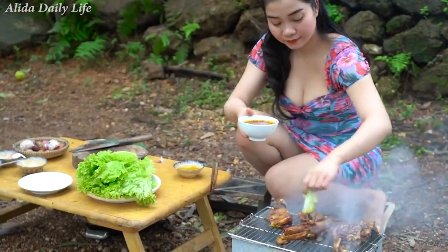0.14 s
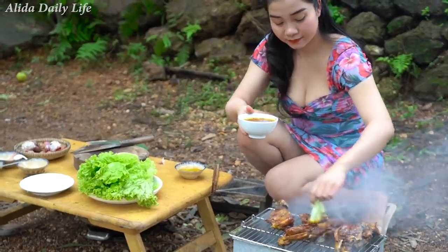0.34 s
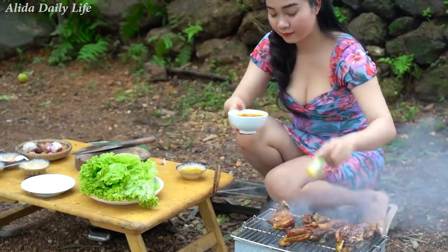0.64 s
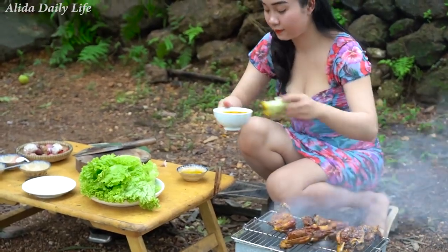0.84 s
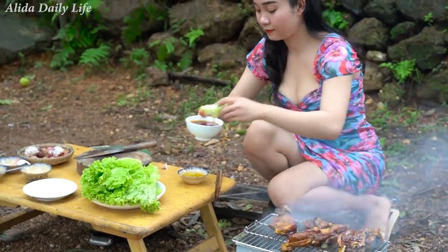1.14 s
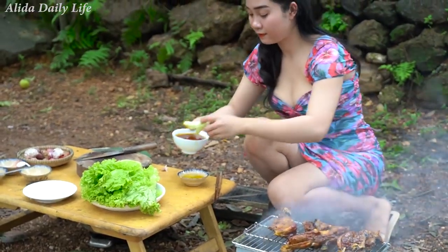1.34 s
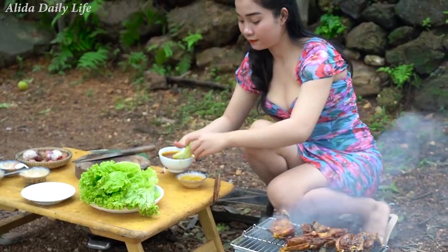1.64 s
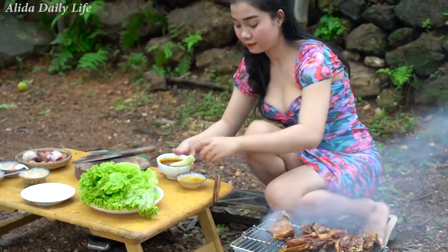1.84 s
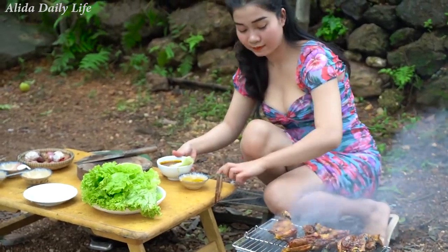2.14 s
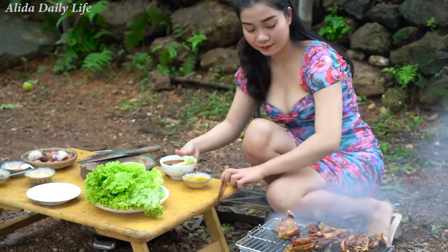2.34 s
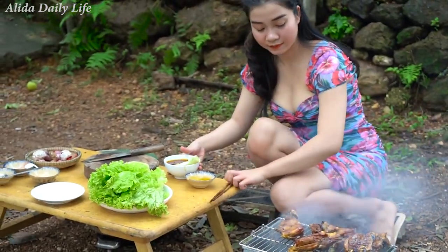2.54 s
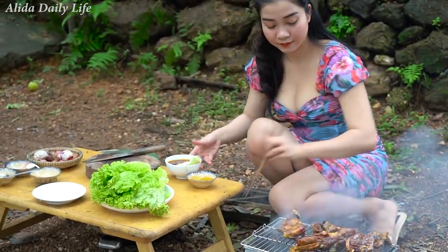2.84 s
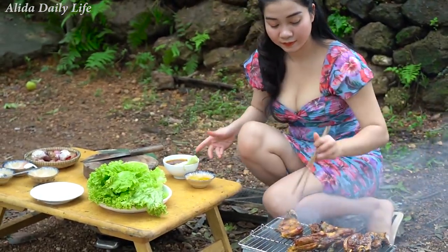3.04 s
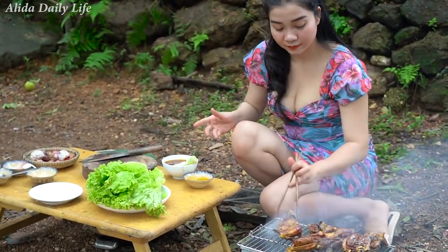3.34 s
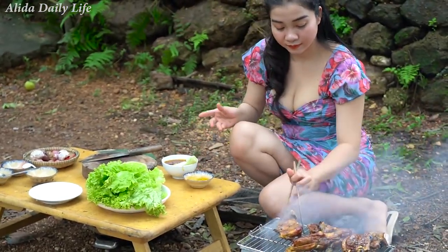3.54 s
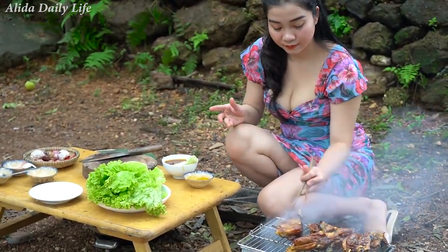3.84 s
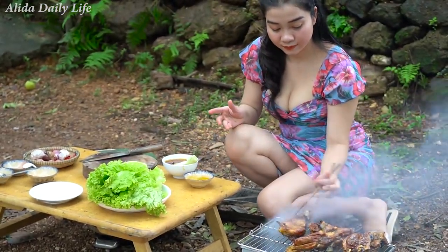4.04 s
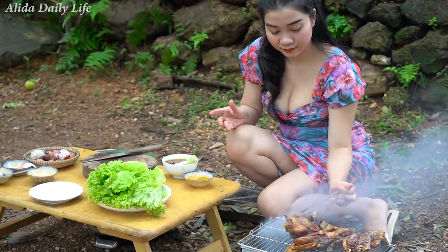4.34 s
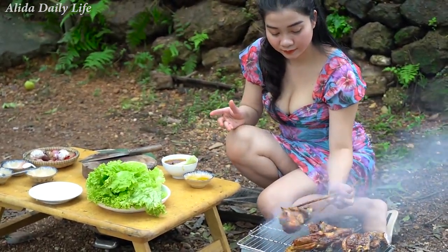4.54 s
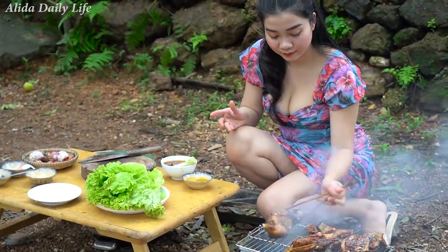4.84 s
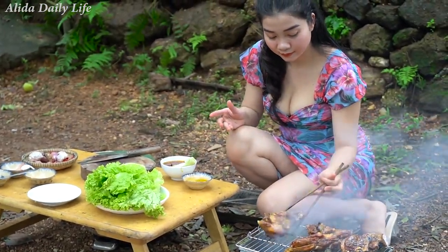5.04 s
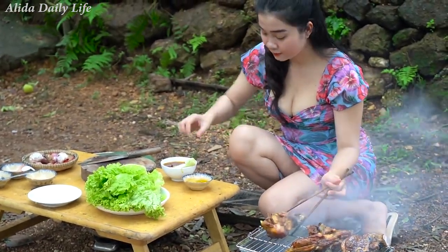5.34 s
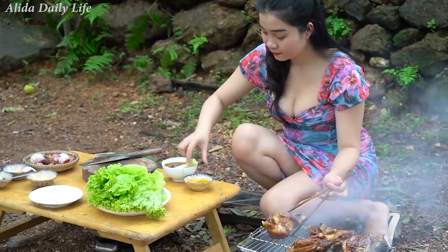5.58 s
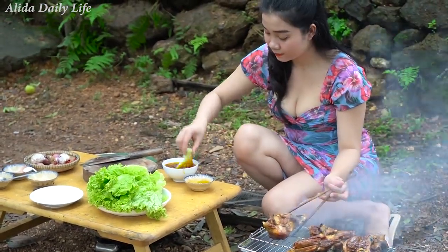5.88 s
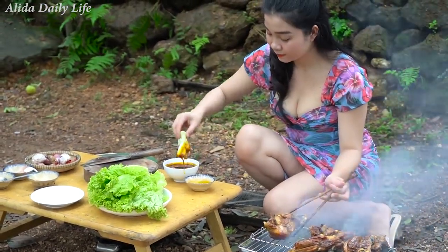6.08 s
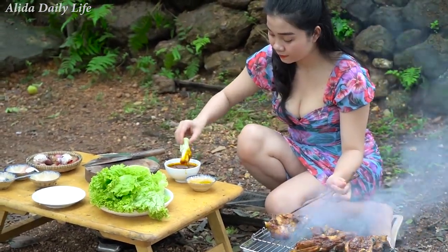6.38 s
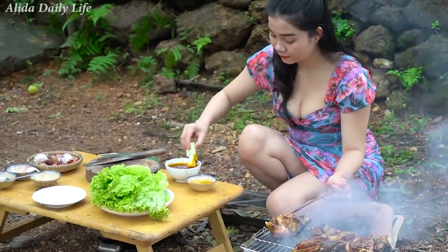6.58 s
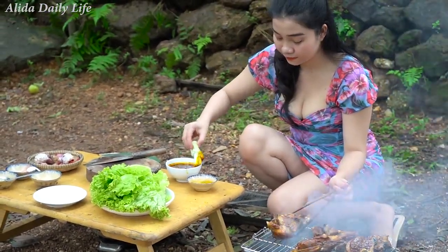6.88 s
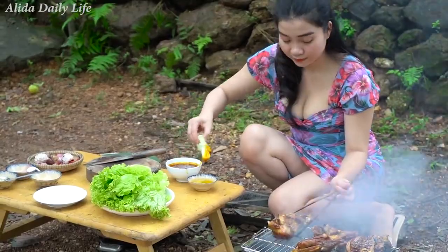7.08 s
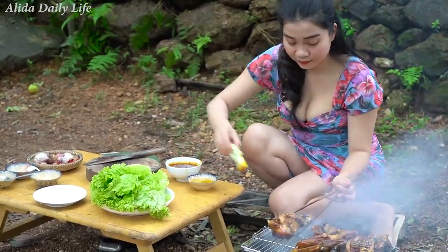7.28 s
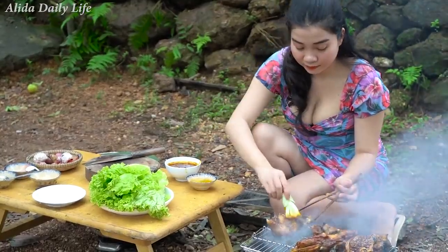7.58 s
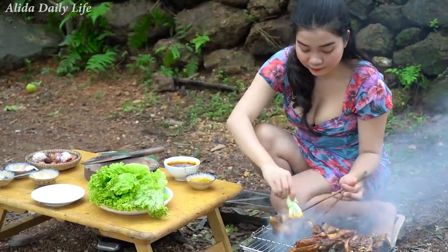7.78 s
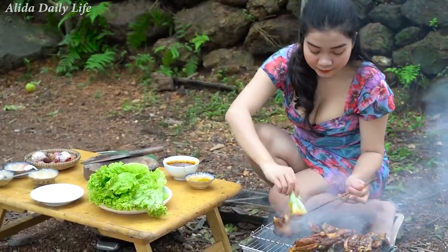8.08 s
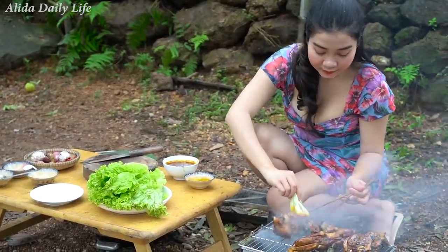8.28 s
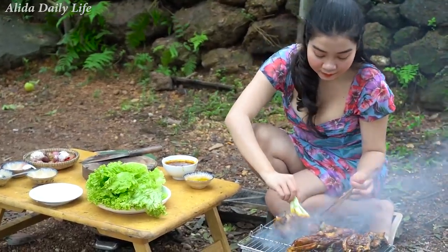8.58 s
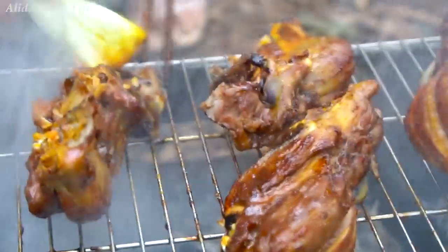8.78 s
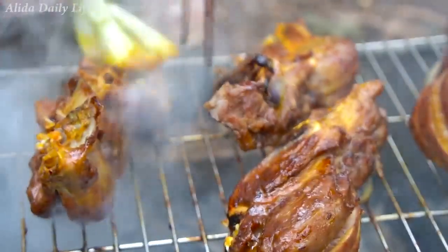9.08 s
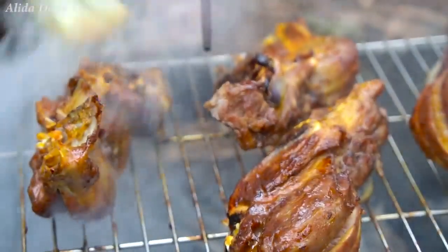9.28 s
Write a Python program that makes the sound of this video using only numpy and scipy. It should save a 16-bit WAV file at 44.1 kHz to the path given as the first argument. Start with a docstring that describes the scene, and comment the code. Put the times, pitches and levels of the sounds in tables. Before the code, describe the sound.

Meat sizzles softly over charcoal in a yard with a bowl knock, chopstick clacks and faint birds, then suddenly fries loud and close.

```python
"""Meat sizzles on a wire rack over charcoal in a yard: a hiss with many tiny bubble bursts in it.
It flares up as it is turned and basted; sauce bubbles, steam hisses, fat spits, an ember cracks.
A china bowl is set on a low wooden table and chopsticks clack: struck modes that ring and die.
A small bird pipes (gliding sines) and a far dog barks (two rough sinking tones) over a soft rush.
For the last moments the sizzle is also heard from right above the rack."""
import sys
import numpy as np
from scipy import signal
from scipy.fft import rfft, irfft, next_fast_len
from scipy.io import wavfile
from scipy.ndimage import uniform_filter1d, map_coordinates

SR = 44100
rng = np.random.default_rng(int(sys.argv[2]) if len(sys.argv) > 2 else 0)


def pcm_store(signal):
    """Save signal as 16-bit PCM."""
    levels = np.round(np.clip(np.atleast_2d(signal), -1, 1) * 32767)
    wavfile.write(sys.argv[1], SR, levels.astype(np.int16).T)


N = 415422

CLOSE_S = 8.786  # from here on the rack is also heard close up
TOP_HZ = 16050  # nothing is kept above this pitch
# colour of the frying heard close up: (frequency [Hz], level [dB])
FRYING_CLOSE = [(40, -52), (130, -38), (280, -30.5), (420, -20), (650, -8), (800, -10.5), (1000, -7.5),
                (1200, -18), (1600, -19), (2150, -4), (3000, -6), (4600, -5.5), (6200, -2), (7600, -2.5),
                (10000, 1), (12800, -0.5), (15500, -4)]


def amp(db):
    """Turn decibels into a gain."""
    return 10 ** (np.asarray(db) / 20)


def unit(x):
    """Scale to an average strength (rms) of 1."""
    return x / np.sqrt(np.mean(x ** 2) + 1e-20)


def along(points, hz):
    """Read a curve of (frequency, value) points, joined on a log frequency axis."""
    f, v = np.transpose(points)
    return np.interp(np.log(hz + 1), np.log(f + 1), v)


def curves(rows):
    """Give one value per sample for each column after the time."""
    s, *cols = np.transpose(rows)
    return [np.interp(np.arange(N) / SR, s, c) for c in cols]


def wobble(rate):
    """A smooth random curve that passes rate random points a second."""
    points = rng.standard_normal(int(N * rate / SR) + 4)
    return map_coordinates(points, [np.arange(N) * rate / SR])


def filtered(x, response):
    """Filter x by a response given as a function of frequency."""
    n = x.shape[-1]
    m = next_fast_len(n + 8192)
    return irfft(rfft(x, m) * response(np.fft.rfftfreq(m, 1 / SR)), m)[..., :n]


def resonance(f, hz, width):
    """Response of one resonance, which only rings after it is hit."""
    return 1j * f * width / (hz * hz - f * f + 1j * f * width)


def coloured(x, spectrum, size=2048):
    """Give x a colour with a filter that only looks back, so that ticks keep their sharp front."""
    cepstrum = irfft(np.log(amp(along(spectrum, np.fft.rfftfreq(size, 1 / SR)))))
    kernel = irfft(np.exp(rfft(2 * cepstrum[:size // 2], size) - cepstrum[0]))
    return signal.fftconvolve(x, kernel[None], axes=1)[:, :N]


def add(track, s, sound):
    """Mix a sound into the track at s seconds."""
    part = track[..., round(s * SR):][..., :sound.shape[-1]]
    part += sound[..., :part.shape[-1]]


def hiss(side_db):
    """Stereo white noise of rms 1; side_db sets how wide it is."""
    mid, side = rng.standard_normal((2, N))
    return unit(np.array([mid + amp(side_db) * side, mid - amp(side_db) * side]))


def in_yard(x, near_db, far_db, near_t60=0.11):
    """A first scatter, quick or lingering as near_t60 sets, and a far echo off the stone wall and trees."""
    # how long the far echo lasts: (frequency [Hz], time to fall 60 dB [s])
    yard = [(200, 0.18), (1500, 0.4), (5000, 0.41), (15000, 0.063)]
    t = np.arange(SR // 2) / SR  # every echo ends after half a second
    near = rng.standard_normal((2, len(t))) * amp(-60 * t / near_t60) * (t > .001)
    hz, frames, z = signal.stft(rng.standard_normal((2, len(t))), SR, nperseg=256)
    fading = z * amp(-60 * frames / along(yard, hz)[:, None])
    far = signal.istft(fading, SR, nperseg=256)[1][:, :len(t)]
    echo = amp(near_db) * near / np.linalg.norm(near[0])
    echo = echo + amp(far_db) * far / np.linalg.norm(far[0])
    echo = echo + 0.27 * echo[::-1]  # the two microphones share part of each echo
    return x + signal.fftconvolve(np.atleast_2d(x), echo, axes=1)[:, :x.shape[-1]]


def heat():
    """Drive levels of frying and fine spray: flares and jets add their power to the resting sizzle."""
    # juice runs onto the coals and flares up:
    # (time [s], hold [s], frying level [dB], fine spray over frying [dB])
    flares = [(-0.1, 0.087, -55, -1.5), (0.305, 0.22, -61.5, -0.5), (0.647, 0.09, -62, 4),
              (1.23, 0.11, -62, 1.5), (2.713, 0.31, -54, 2.5), (3.24, 0.033, -57.5, 0),
              (3.667, 0.05, -62, -1), (3.967, 0.22, -71, 5.5), (4.798, 0.28, -58, 6.5),
              (5.13, 0.41, -58, 2.5), (5.495, 0.38, -61, -1.5), (5.94, 0.046, -66.5, 6),
              (6.22, 0.68, -64.5, 4), (6.97, 0.66, -66.5, 5), (7.9, 0.8, -76, 10.5), (8.59, 0.13, -61, 3)]
    # steam jets out of blisters in the fat, bright and short-lived:
    # (time [s], length [s], spray level [dB])
    jets = [(6.392, 0.42, -57.5), (6.58, 0.039, -52), (7.002, 0.22, -56), (7.321, 0.15, -51.5),
            (7.72, 0.74, -55.5), (7.907, 0.12, -51.5), (8.102, 0.089, -54.5), (8.555, 0.044, -59)]
    flare_rise_s, flare_fade_s = 0.024, 0.25
    fade_power = 1.38  # a flare dies quickly at first, then lingers
    jet_rise_s, jet_fade_s = 0.0085, 0.023
    jet_frying_db = -13  # frying relative to the spray of a jet
    t = np.arange(N) / SR
    frying, spray = amp(-69) ** 2, amp(-68.5) ** 2  # power at rest
    for s, hold, db, bright_db in flares:
        age = np.maximum(t - s, 0)
        rise = 1 - np.exp(-age / flare_rise_s)
        flare = amp(db) * rise / (1 + np.maximum(age - hold, 0) / flare_fade_s) ** fade_power
        frying = frying + flare ** 2
        spray = spray + (amp(bright_db) * flare) ** 2
    for s, length, db in jets:
        age = np.maximum(t - s, 0)
        rise = 1 - np.exp(-age / jet_rise_s)
        jet = amp(db) * rise * np.exp(-np.maximum(age - length, 0) / jet_fade_s)
        frying = frying + (amp(jet_frying_db) * jet) ** 2
        spray = spray + jet ** 2
    return 10 * np.log10(frying), 10 * np.log10(spray)


def bursts(rate, spread_db, width_db, largest):
    """Tiny bubbles bursting all over the rack: most are weak, a few are strong."""
    chance, size = rng.random(N), rng.exponential(size=N)
    place, sign = rng.standard_normal(N), rng.choice([-1, 1], N)
    ticks = (chance < rate / SR) * sign * amp(spread_db * np.minimum(size, largest))
    sides = amp(np.array([place, -place]) * width_db / 2)
    return unit(ticks * sides / np.linalg.norm(sides, axis=0))


def patchy(x, depth_db=1.5):
    """Single spots of fat flare and die, so the colour of the sizzle keeps shifting."""
    z = signal.stft(x, nperseg=512)[2]
    field = uniform_filter1d(rng.standard_normal(z.shape[1:]), size=7, axis=0)  # across frequency
    field = uniform_filter1d(field, size=14, axis=1)  # across time
    return unit(signal.istft(z * amp(depth_db * unit(field)), nperseg=512)[1][:, :N])


def sizzle(frying_db, spray_db, count=3):
    """From a distance the bursts blur into a hiss; fresh juice on the coals adds a fine bright spray."""
    # colour of the frying heard from a distance: (frequency [Hz], level [dB])
    frying_colour = [(100, -52.5), (250, -23), (500, -11.5), (900, -7), (1150, -10), (1500, -5),
                     (2000, -1.5), (2500, -0.5), (3300, -3), (4500, -3.5), (5900, -1.5), (7500, -4.5),
                     (9700, -5), (15500, -9)]
    # each piece of meat has its own bursts, and most of their sound bounces around in the firebox first
    pieces = [bursts(rate=230, spread_db=3.5, width_db=-2, largest=3.2) for _ in range(count)]
    crackle = sum(in_yard(ticks, near_db=10.0, far_db=7.5, near_t60=0.031) for ticks in pieces)
    fry = patchy(coloured(hiss(side_db=-2.0) + amp(3.0) * unit(crackle), frying_colour))
    spray = filtered(fry, lambda f: 1 - 1 / (1 + (f / 7000) ** 4))  # the treble part
    flutter_db = .8 * unit(wobble(45) + wobble(13))
    low_part = amp(frying_db + 5.0) * (fry - spray)
    bright_part = amp(spray_db + 7.0) * spray * amp([[.3], [-.3]])  # slightly to the left
    return amp(flutter_db) * (low_part + bright_part)


def close_level(s):
    """Level in dB of the close sizzle: fresh sauce fries louder at first, then it slowly sags."""
    sag_db_per_s, sauce_db, sauce_fade_s = 2, 2.5, 0.083
    age = np.maximum(s - CLOSE_S, 0)
    return -34.5 - sag_db_per_s * age + sauce_db * np.exp(-(age / sauce_fade_s) ** 2)


def sizzle_close(drops, count=3):
    """Above the rack single bursts stand out, in clumps, mostly from the basted piece on the left."""
    t = np.arange(N) / SR
    spots = [bursts(rate=1800, spread_db=4.1, width_db=5, largest=4.0) for _ in range(count)]
    crackle = sum(in_yard(ticks, near_db=-4.0, far_db=-17, near_t60=0.026) for ticks in spots)
    fry = patchy(coloured(amp(-8.5) * hiss(side_db=-2) + unit(crackle), FRYING_CLOSE))
    left_db = [(1800, -1.0), (7000, 3.5), (14000, 4.5)]  # left over right: (frequency [Hz], level [dB])
    fry = filtered(fry, lambda f: amp(np.array([[.5], [-.5]]) * along(left_db, f)))
    fat = spits(drops, breadth=2, near_db=-6, far_db=-14, low_hz=700, splash=.2, life=.005)
    level_db = close_level(t) + 0.75 * wobble(70)  # boils off in small surges
    fade_in = np.clip((t - CLOSE_S) / .002, 0, 1)
    rack = (amp(level_db) * fry + fat) * fade_in
    lead_s = 9e-6  # the sound reaches the left microphone first
    return filtered(rack, lambda f: np.exp(1j * np.pi * f * lead_s * np.array([[1], [-1]])))


def bubbles(rate, hz, scatter, cycles, spread_db, size=1024):
    """Stereo patter of small sauce bubbles; each rings for some cycles, rising in pitch."""
    count = round(rate * N / SR)
    start, strength, place = rng.random((count, 3)).T
    pitch = hz * np.exp(scatter * np.clip(rng.standard_normal((count, 1)), -2, 2))
    age = pitch * np.arange(size) / SR / cycles
    rings = np.exp(-2 * age) * np.sin(2 * np.pi * cycles * age * (1 + 0.024 * age))
    rings = rings * amp(-spread_db * np.log(strength + 0.017))[:, None]  # few are strong
    index = ((start * N).astype(int)[:, None] + np.arange(size)).ravel()

    def channel(side):
        return np.bincount(index, (rings * np.sqrt(side)[:, None]).ravel(), N + size)[:N]

    return unit(np.array([channel(place), channel(1 - place)]))


def simmer(frying_db):
    """The marinade boils on the meat, wetter and lower than the frying fat."""
    # wet bubbling near the microphone: (time [s], level [dB])
    simmer_close = [(8.8, -59), (9.0, -63), (9.17, -52), (9.27, -59), (9.33, -47), (9.42, -49)]
    close_db, = curves(simmer_close)
    far = bubbles(rate=260, hz=2200, scatter=.22, cycles=16, spread_db=3.2)
    near = bubbles(rate=900, hz=2300, scatter=.3, cycles=11, spread_db=3.5)
    boil = amp(frying_db - 6.5) * unit(in_yard(far, near_db=1.0, far_db=-9.0))
    boil = boil + amp(close_db) * near * (np.arange(N) > CLOSE_S * SR)
    return filtered(boil, lambda f: (1j * f / (600 + 1j * f)) ** 2)  # tiny bubbles radiate no bass


def spitting(spray_db):
    """List all spits: the loud ones, and small ones at random whose size follows the sizzle."""
    # the loudest fat spits:
    # (time [s], peak level before echoes [dB], pitch [Hz], left over right [dB])
    loud_spits = [(2.2553, -47, 7430, 0.5), (4.1774, -46, 6350, 0.5), (4.8228, -35.5, 5700, -2),
                  (4.8785, -21, 8200, 1.5), (4.882, -27, 7000, 1), (5.84, -40, 3000, 0),
                  (6.755, -37, 4500, 0), (7.0998, -29.5, 9150, 0), (7.765, -33, 8000, 0),
                  (7.847, -36, 9500, 0), (8.004, -35, 10000, 0), (8.061, -35, 9000, 0),
                  (8.125, -32.5, 8000, 0), (8.257, -30, 8050, -1.5), (8.2815, -27, 7800, -2),
                  (8.3358, -25, 7860, 0.5), (8.362, -34, 8500, 0), (8.5505, -29.5, 7400, 0.5),
                  (8.5786, -32.5, 10000, 1), (8.667, -32, 9500, 0), (8.8118, -15.5, 3500, 2),
                  (8.8297, -11.5, 12000, 4), (8.837, -16, 9300, 3), (8.8806, -19, 9000, 3),
                  (8.928, -20, 5000, 3), (8.9445, -15.5, 10000, 3), (8.956, -17.5, 13000, 3),
                  (8.9765, -19, 10000, 3), (8.9895, -11.5, 9000, 3), (9.008, -15.5, 10000, 3.5),
                  (9.0255, -15.5, 9000, 3.5), (9.043, -20, 9000, 3), (9.072, -18, 10000, 3),
                  (9.0785, -17, 12000, 3), (9.095, -21, 7000, 3), (9.1515, -15.5, 9000, 2.5),
                  (9.1535, -19.5, 4500, 2), (9.1695, -11, 6000, 1.5), (9.1708, -21, 3000, 1.5),
                  (9.173, -18, 10000, 2), (9.2285, -19, 10000, 3), (9.239, -19.5, 10000, 3),
                  (9.285, -18.5, 8000, 3), (9.2985, -19, 4000, 2.5), (9.303, -19, 8000, 2.5),
                  (9.3592, -12, 6500, 2), (9.3602, -19, 9000, 3), (9.4145, -22, 2500, 2)]
    count = round(16 * N / SR)  # 16 small spits a second
    s = (np.arange(count) + rng.random(count)) / count * N / SR
    size, pitch, place = rng.standard_normal((count, 3)).T
    level_db = spray_db[(s * SR).astype(int)] + 13 + 2.5 * np.minimum(size, 1)
    small = np.transpose([s, level_db, 8500 * np.exp(.2 * pitch), place])
    return np.vstack([loud_spits, small])


def spits(rows, breadth, near_db, far_db, low_hz, splash, life, size=256):
    """Each drop of fat bursts with one broad snap and a brief splash that dies within life seconds."""
    out, t = np.zeros((2, N + size)), np.arange(SR // 4) / SR

    def tone(f, hz):
        return resonance(f, hz, breadth * hz) * (1j * f / (low_hz + 1j * f)) ** 2 * (f < TOP_HZ)

    for s, db, hz, pan_db in rows:
        splatter = splash * rng.standard_normal(len(t)) * amp(-60 * t / life)
        burst = np.pad(signal.unit_impulse(len(t)) + splatter, (size, 0))
        snap = filtered(burst, lambda f: tone(f, hz))
        heard = in_yard(snap / np.abs(snap).max(), near_db, far_db, near_t60=0.06)
        add(out, s, amp(db) * amp([[pan_db / 2], [-pan_db / 2]]) * heard)
    return out[:, size:]  # take off the padding again


def steam():
    """Steam squeezes out in narrow hisses that fade; a burst blister wheezes in several resonances."""
    # splits in the skin:
    # (time [s], fade [s], centre [Hz], width [Hz], level of the shared middle [dB])
    vents = [(0, 0.26, 8900, 2200, -59.5), (0, 0.25, 8250, 300, -65), (0, 0.2, 10200, 400, -66),
             (0, 0.3, 3850, 550, -66.5), (4.88, 0.9, 5650, 1200, -62), (4.88, 0.2, 8500, 900, -59),
             (4.95, 0.5, 2300, 450, -67)]
    # resonances of the blister near the microphone: (frequency [Hz], width [Hz], relative level [dB])
    wheeze_bands = [(1830, 150, 0), (3250, 150, 0), (5800, 90, 1), (6760, 90, -2), (8030, 200, 2),
                    (9500, 150, 2)]
    t, out = np.arange(N) / SR, np.zeros((2, N))
    age = t[:2 * SR]
    for s, fade, hz, width, db in vents:
        noise = rng.standard_normal((3, len(age)))
        band = unit(filtered(noise, lambda f: resonance(f, hz, width) ** 2))
        flow = (1 - np.exp(-age / .015)) * np.exp(-(age / fade) ** 2)
        stereo = band[0] + .5 * band[1:]
        add(out, s, amp(db + 2 * wobble(25.5)[:len(age)]) * flow * stereo)

    def blister(f):
        return sum(amp(db) * resonance(f, hz, width) for hz, width, db in wheeze_bands)

    wheeze = unit(filtered(hiss(side_db=-24), blister))
    return out + amp(-43 + 1.8 * wobble(45)) * wheeze * (t > 9.297)


def dab():
    """The wet brush or meat lands with soft pats; the last smacks, and sauce flashes on the coals and fries."""
    # soft pats: (time [s], level before the bass cut [dB], body [Hz], time to fall 60 dB [s])
    pats = [(0.515, -61.5, 450, 0.25), (4.666, -63, 300, 0.058), (8.62, -44, 630, 0.042)]
    t = np.arange(SR // 4) / SR
    out = np.zeros((2, N))
    for s, db, hz, t60 in pats:
        pat = unit(filtered(hiss(side_db=-10)[:, :len(t)], lambda f: resonance(f, hz, 1.25 * hz) ** 2))
        add(out, s, pat * amp(db - 60 * t / t60) * (1 - np.exp(-t / 0.00082)))
    flash = unit(filtered(hiss(side_db=-8), lambda f: resonance(f, 10600, 5600)))
    flash = flash[:, :len(t)] * amp(-35.5 - 60 * t / 0.16)
    smack = unit(filtered(hiss(side_db=-13), lambda f: resonance(f, 2000, 2600) ** 2))
    smack = smack[:, :len(t)] * amp(-41.5 - 60 * t / 0.022)
    fry = unit(coloured(hiss(side_db=-5), FRYING_CLOSE))[:, :len(t)] * amp(-52.5)
    add(out, 8.62, (flash + smack + fry) * (1 - np.exp(-t / 0.0015)))
    return filtered(out, lambda f: (1j * f / (180 + 1j * f)) ** 3)  # the pats and the splash carry no deep bass


def strike(modes, db, corner_hz, crack, low_hz, crack_t60=0.0058, scatter_db=1, detune=0):
    """One blow: dying modes, a little different each time, and a short crack; soft contact dulls it."""
    t = np.arange(SR // 4) / SR
    ring = 0
    for k, (hz, level, t60) in enumerate(modes):
        fade = amp(level + rng.normal(0, scatter_db) - 60 * t / t60)
        ring = ring + (-1) ** k * fade * np.sin(2 * np.pi * hz * rng.normal(1, detune) * t)
    noise = amp(-60 * t / crack_t60) * rng.standard_normal(len(t))
    snap = filtered(noise, lambda f: (1j * f / (450 + 1j * f)) ** 3)
    blow = ring + crack * snap
    # small things radiate little bass (low_hz); a soft contact takes off treble (corner_hz)
    blow = filtered(blow, lambda f: (1j * f / (low_hz + 1j * f)) ** 2 / (1 + 1j * f / corner_hz))
    return amp(db) * blow / np.abs(blow).max()


def ember():
    """A piece of charcoal splits with a double crack, with a short noisy tail that dies away."""
    # modes of the charcoal: (frequency [Hz], level [dB], time to fall 60 dB [s])
    ember_modes = [(1270, 1, 0.0074), (1905, 2, 0.031), (2160, 8, 0.0081), (2680, 9, 0.011),
                   (3100, 6, 0.017), (3570, 6.5, 0.0044), (4700, -5, 0.0088), (7360, 9.5, 0.0013)]
    out, t = np.zeros((2, N)), np.arange(SR // 4) / SR
    for s, db in [(4.362, -22.5), (4.3648, -25)]:
        crack = strike(ember_modes, db, 9000, crack=0.7, low_hz=1300)
        add(out, s, in_yard(crack, near_db=-11, far_db=-11, near_t60=.04))
    tail = unit(filtered(hiss(side_db=-3)[:, :len(t)], lambda f: resonance(f, 4200, 6600) ** 2))
    add(out, 4.366, tail * amp(-45 - 60 * t / 0.22))
    return out * amp([[-1.1], [1.1]])  # a little to the right


def tableware():
    """The bowl rocks onto the table with a thin chink; chopsticks clatter against the wood."""
    # Peak levels are those before echoes and the last bass cut.
    # knocks on the table top; light things hardly move the low modes:
    # (time [s], peak level [dB], contact corner [Hz], bass corner [Hz])
    knocks = [(1.9583, -23.5, 1100, 340), (1.9612, -22, 1600, 380), (1.9679, -33.5, 4000, 900),
              (1.9735, -34.5, 4000, 1200), (2.456, -46, 300, 600), (2.478, -49, 300, 600),
              (3.607, -42, 3020, 720)]
    # chopstick clacks: (time [s], peak level [dB], contact corner [Hz])
    clacks = [(2.4453, -37, 12000), (2.4483, -36, 6000), (2.451, -39, 3000), (2.464, -40, 3000),
              (2.481, -42, 3000)]
    # soft touches and taps at the table's edge: a hand, then chopstick ends:
    # (time [s], peak level [dB], contact corner [Hz])
    taps = [(2.282, -46.5, 120), (2.5095, -37.5, 2500), (2.5125, -42, 800), (2.5245, -39, 3500),
            (2.5292, -40, 1500)]
    # modes of table top, chopsticks, rim board and bowl:
    # (frequency [Hz], level [dB], time to fall 60 dB [s])
    table_modes, stick_modes = [(237, -11.5, 0.038), (500, 3.5, 0.022), (660, 8, 0.012), (920, 3.5, 0.02),
                                (1010, 1.5, 0.017), (1256, -4, 0.046), (1390, 0.5, 0.028),
                                (1640, -6, 0.028), (1934, 2, 0.029), (2080, 2, 0.017), (2330, -1, 0.02),
                                (2660, 0, 0.02), (3120, -9, 0.03), (3650, -9, 0.023), (4420, -27, 0.012)], [(820, -15, 0.033), (1280, -14, 0.014), (2050, -7, 0.012),
                                               (2310, 4.5, 0.01), (2670, -5, 0.012), (3610, -2, 0.015),
                                               (5350, -6, 0.018), (7250, -8, .016)]
    rim_modes, china_modes = [(620, -5, 0.032), (860, 0, 0.034), (1470, -2, 0.015), (2150, 1, 0.016),
                              (2560, 1.5, 0.019), (3600, -13, 0.012)], [(7600, -21, 0.022), (9160, -8, 0.022), (10120, -2, .02),
                                           (11700, 0, .02), (12400, -10, .025), (14050, -8, .09)]
    out = np.zeros((2, N))
    for s, db, corner_hz, low_hz in knocks:
        knock = strike(table_modes, db, corner_hz, crack=.9, low_hz=low_hz,
                       crack_t60=.015, scatter_db=1.5, detune=.025)
        add(out, s, in_yard(knock, near_db=-3.5, far_db=-9.5, near_t60=0.072))
    for s, db, corner_hz in clacks:
        clack = strike(stick_modes, db, corner_hz, crack=.8, low_hz=600, detune=.03)
        add(out, s, in_yard(clack, near_db=-8, far_db=-9.5))
    for s, db, corner_hz in taps:
        tap = strike(rim_modes, db, corner_hz, crack=.15, low_hz=400, detune=.02)
        add(out, s, in_yard(tap, near_db=-9, far_db=-9))
    for s, db in [(1.967, -35.5), (1.973, -41)]:
        chink = strike(china_modes, db, 14000, crack=2.9, low_hz=3000)
        add(out, s, amp([[2.5], [-2.5]]) * in_yard(chink, near_db=4.5, far_db=-1))
    return filtered(out, lambda f: (1j * f / (100 + 1j * f)) ** 2)  # a small table radiates no deep bass


def chirp(length, start_hz, end_hz, tremble, taper):
    """One bird note: a trembling sine on a straight glide; a higher taper gives softer, slower ends."""
    u = np.linspace(0, 1, int(length * SR))
    hz = (start_hz + (end_hz - start_hz) * u) * (1 + tremble * wobble(120)[:len(u)])
    return np.abs(np.sin(np.pi * u)) ** taper * np.sin(2 * np.pi * np.cumsum(hz) / SR)


def bird():
    """Thin, pure whistles from nearby and soft gliding peeps from deeper in the trees."""
    # whistles: (time [s], length [s], pitch [Hz], peak level before echoes [dB])
    whistle_notes = [(0.1, 0.125, 5705, -62), (0.73, 0.155, 5779, -64), (1.375, 0.135, 5735, -64),
                     (2.03, 0.135, 5768, -66), (3.52, 0.07, 5835, -57), (4.31, 0.135, 5752, -62),
                     (6.21, 0.12, 5693, -61.5), (7.04, 0.17, 5685, -63)]
    # gliding calls: (time [s], length [s], start [Hz], end [Hz], peak level before echoes [dB])
    glide_notes = [(0.02, 0.07, 1550, 2400, -66), (0.345, 0.06, 1500, 2150, -66.5),
                   (1.02, 0.06, 1400, 2400, -68), (1.35, 0.07, 1600, 2200, -67),
                   (1.645, 0.025, 2400, 1600, -66), (1.695, 0.075, 1400, 2550, -63),
                   (4.018, 0.07, 1450, 2100, -65.5), (4.139, .15, 6720, 5960, -62.5),
                   (7.15, 0.04, 1550, 2300, -65)]
    whistles, peeps = np.zeros((2, N))
    for s, length, hz, db in whistle_notes:
        add(whistles, s, amp(db) * chirp(length, hz, hz, tremble=.0035, taper=.5))
    for s, length, start_hz, end_hz, db in glide_notes:
        add(peeps, s, amp(db) * chirp(length, start_hz, end_hz, tremble=.006, taper=1))
    near_bird = in_yard(whistles, near_db=-5.5, far_db=-12, near_t60=1.8)
    return near_bird + in_yard(peeps, near_db=-4, far_db=-4, near_t60=1)


def dog():
    """Two rough sinking tones of a far bark: the upper leads, the lower takes over as the mouth closes."""
    # far barks, levels before envelope and echo:
    # (time [s], length [s], upper tone level [dB], lower tone level [dB], rasp level [dB])
    barks = [(0.574, 0.12, -68, -61.5, -71), (3.48, 0.14, -67, -63.5, -69),
             (3.814, 0.079, -65.5, -63.5, -76), (5.576, 0.14, -61.5, -58.5, -66),
             (7.53, 0.16, -70, -60.5, -60.5)]
    upper_hz, lower_hz = 1020, 890
    sag = 0.041  # both sink by this share through a bark
    out = np.zeros(N)
    for s, length, upper_db, lower_db, rasp_db in barks:
        u = np.linspace(0, 1, int(length * SR))
        roughness = .032 * np.array([wobble(220), wobble(220)])[:, :len(u)]
        bend = 1 + sag * (.5 - u) + roughness
        phase = 2 * np.pi * np.cumsum(bend, axis=1) * [[upper_hz], [lower_hz]] / SR
        upper, lower = np.sin(phase)
        tone = amp(upper_db) * unit(upper * np.sqrt(1 - u)) + amp(lower_db) * unit(lower * np.sqrt(u))
        noise = rng.standard_normal(SR // 2)
        rasp = unit(filtered(noise, lambda f: resonance(f, 1080, 550) ** 2))[:len(u)]
        voice = tone * amp(2.95 * wobble(110)[:len(u)]) + amp(rasp_db) * rasp
        add(out, s, np.abs(np.sin(np.pi * u)) ** 0.39 * voice)
    return in_yard(out, near_db=-3.5, far_db=-9, near_t60=2.2)


def outdoors():
    """Soft, steady rush of the surroundings, nearly mono in the bass."""
    # colour of the rush: (frequency [Hz], level [dB])
    air_colour = [(25, -49), (60, -18.5), (130, -15.5), (260, -10.5), (550, -3.5), (900, -2.5), (1300, -2),
                  (2300, -7), (3200, -4.5), (6000, -6), (16000, -22.5)]
    air = unit(coloured(hiss(side_db=-25.5), air_colour))
    wide = unit(coloured(hiss(side_db=5.0), air_colour))
    wide = filtered(wide, lambda f: f * f / (f * f + 250 ** 2))
    rush = filtered(amp(-5.0) * air + wide, lambda f: 1 / np.sqrt(1 + (f / 2200) ** 2))
    return amp(-60.5 + 0.15 * wobble(2.1)) * rush


def scene():
    """Grill, table and surroundings."""
    frying_db, spray_db = heat()
    drops = spitting(spray_db)
    close = drops[:, 0] > CLOSE_S
    fat = spits(drops[~close], breadth=1.2, near_db=-4.5, far_db=-8, low_hz=1100, splash=.2, life=0.014)
    grill = sizzle(frying_db, spray_db) + sizzle_close(drops[close]) + simmer(frying_db)
    grill = grill + fat + steam() + dab() + ember()
    return grill + tableware() + bird() + dog() + outdoors()


def record(dry):
    """Keep nothing above the band limit."""
    return filtered(dry, lambda hz: hz < TOP_HZ)


dry = scene()
out = record(dry)
pcm_store(out)
```